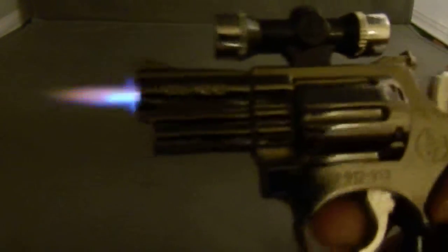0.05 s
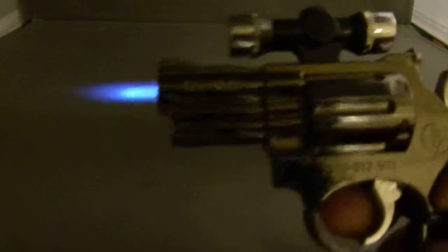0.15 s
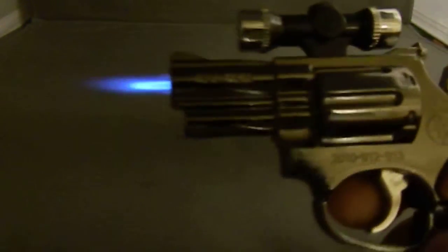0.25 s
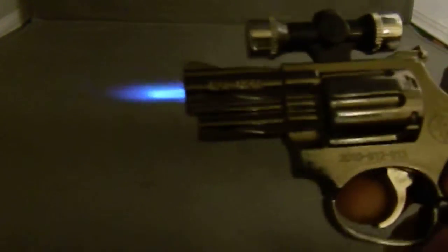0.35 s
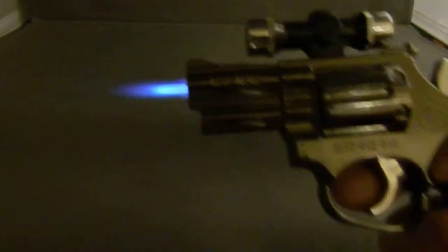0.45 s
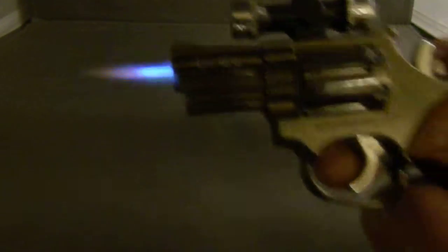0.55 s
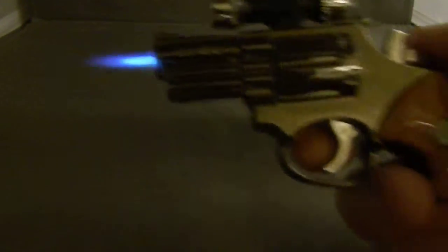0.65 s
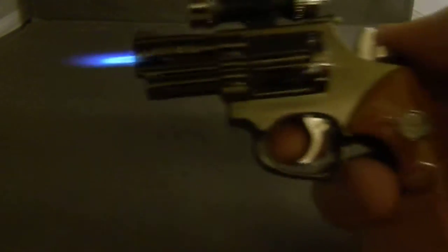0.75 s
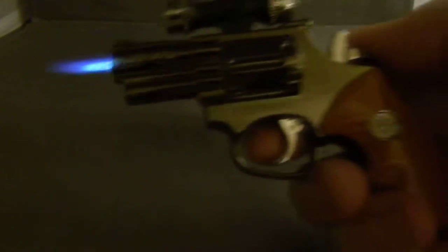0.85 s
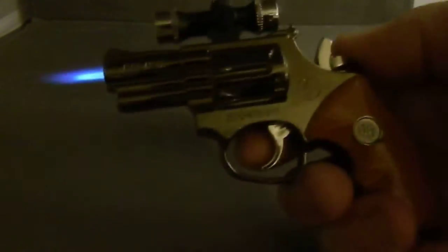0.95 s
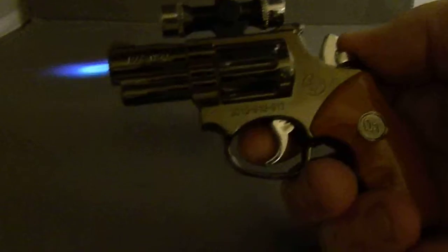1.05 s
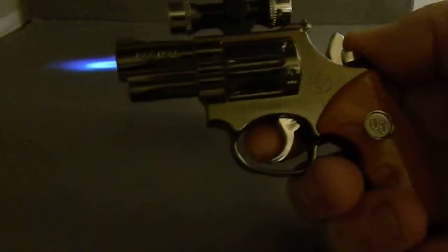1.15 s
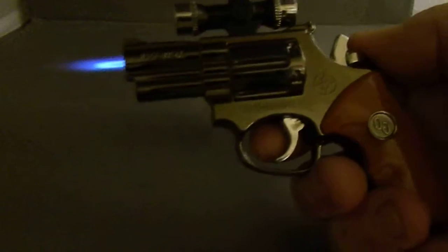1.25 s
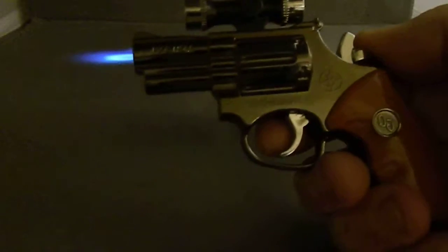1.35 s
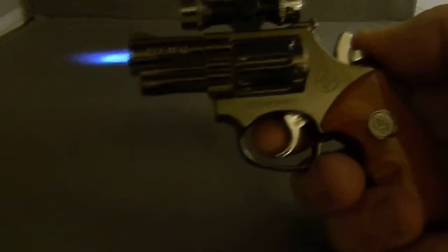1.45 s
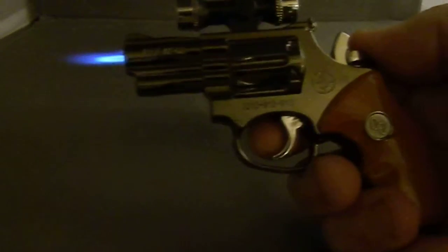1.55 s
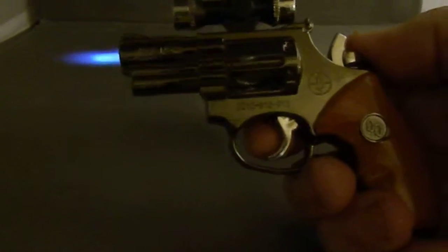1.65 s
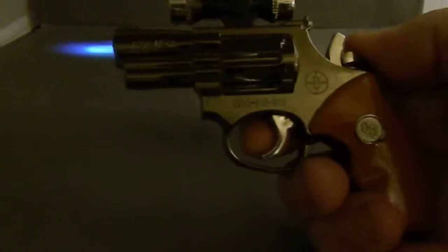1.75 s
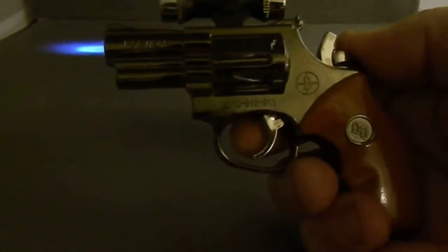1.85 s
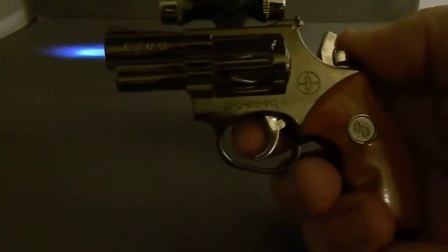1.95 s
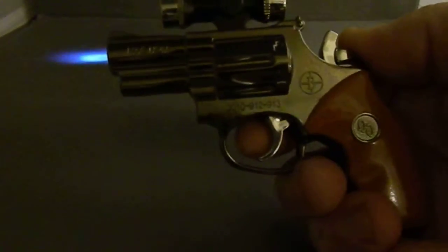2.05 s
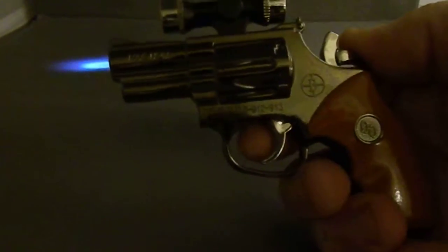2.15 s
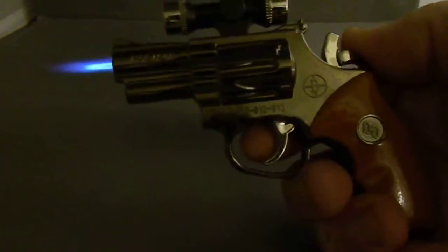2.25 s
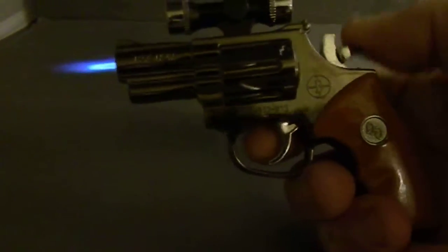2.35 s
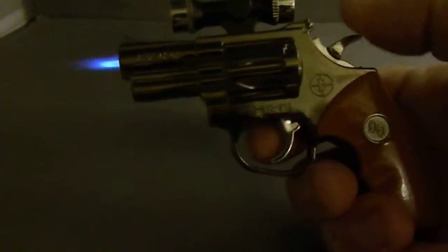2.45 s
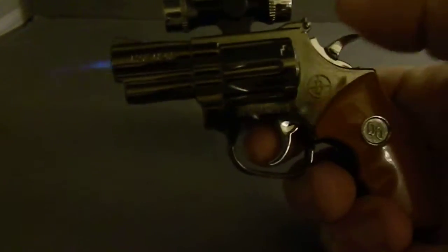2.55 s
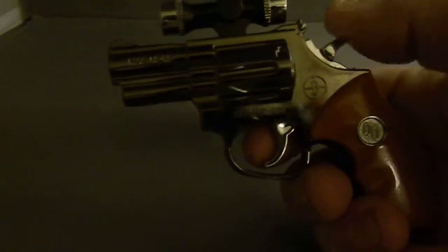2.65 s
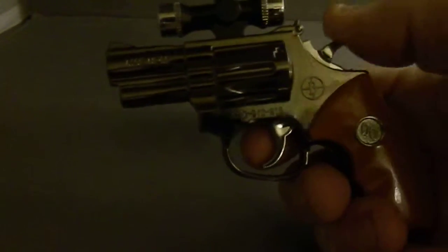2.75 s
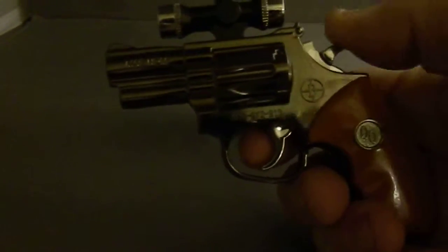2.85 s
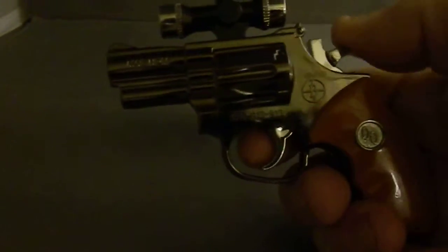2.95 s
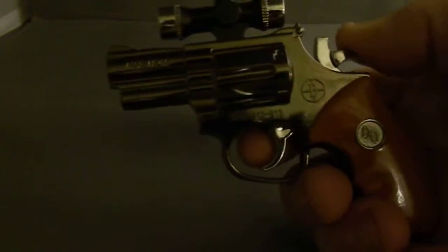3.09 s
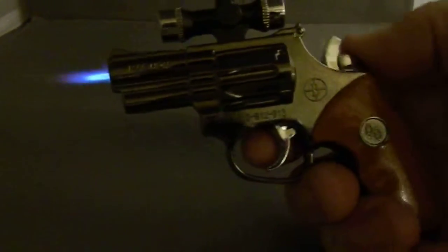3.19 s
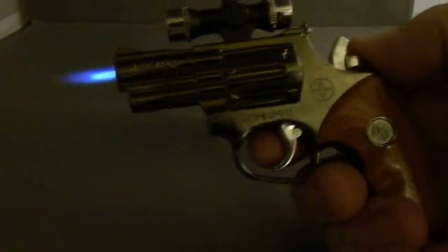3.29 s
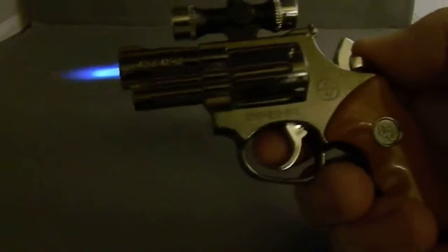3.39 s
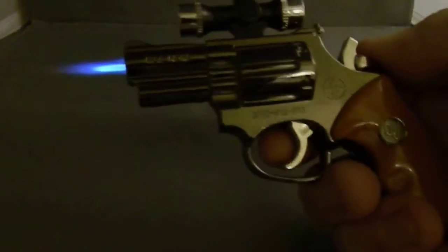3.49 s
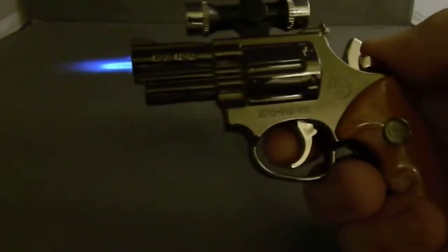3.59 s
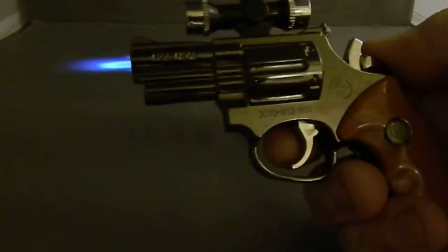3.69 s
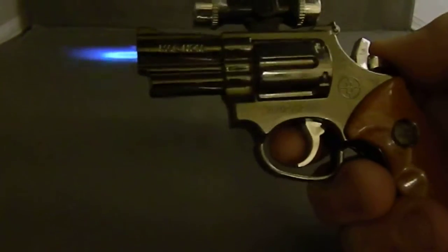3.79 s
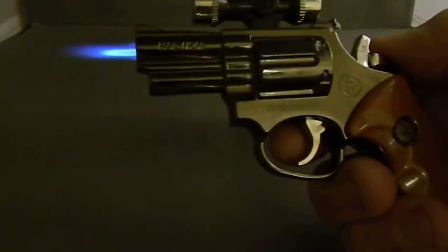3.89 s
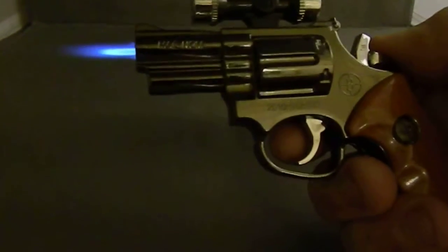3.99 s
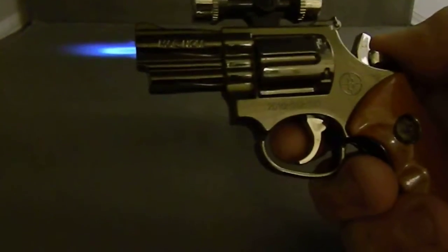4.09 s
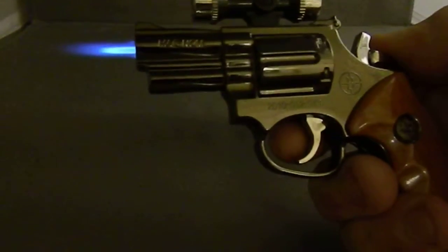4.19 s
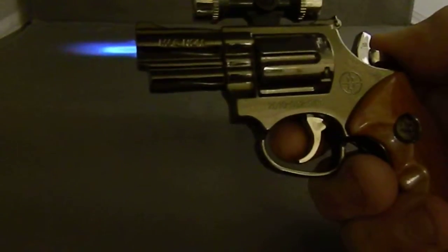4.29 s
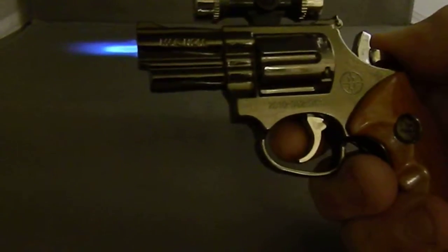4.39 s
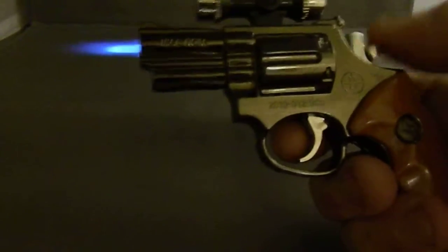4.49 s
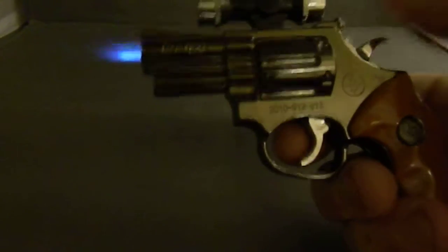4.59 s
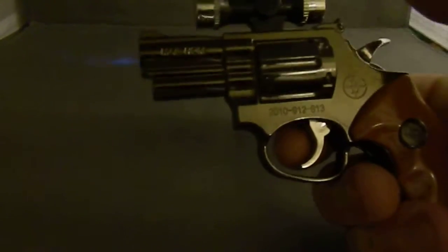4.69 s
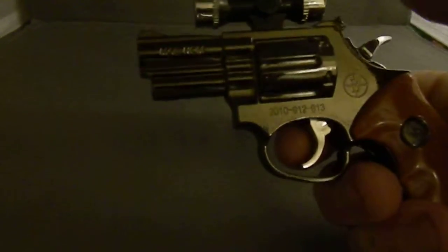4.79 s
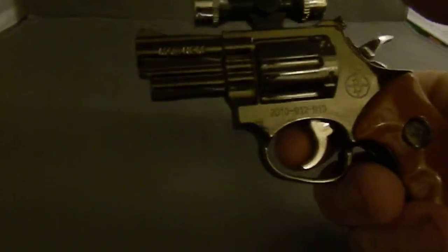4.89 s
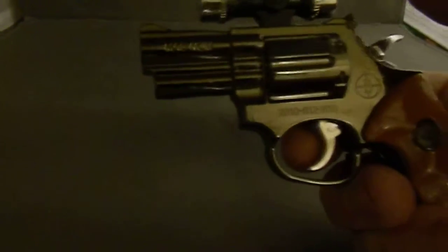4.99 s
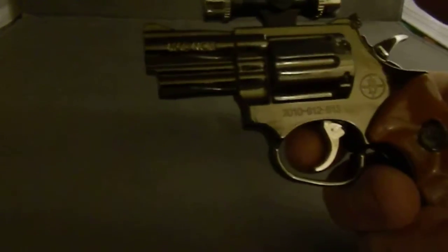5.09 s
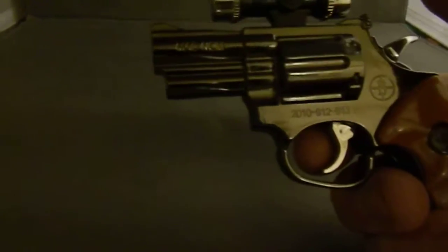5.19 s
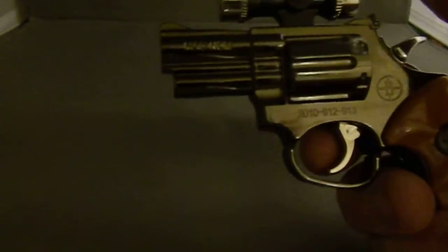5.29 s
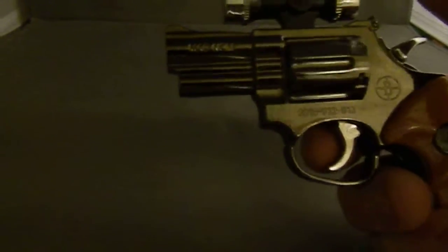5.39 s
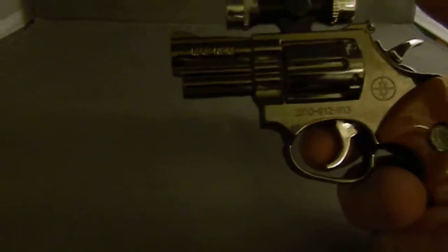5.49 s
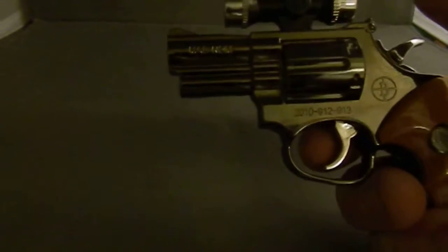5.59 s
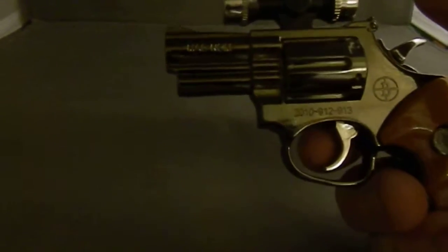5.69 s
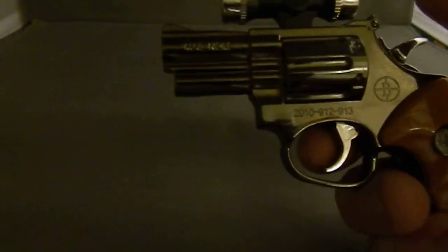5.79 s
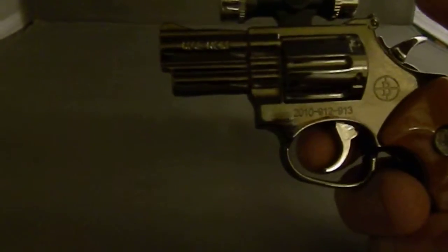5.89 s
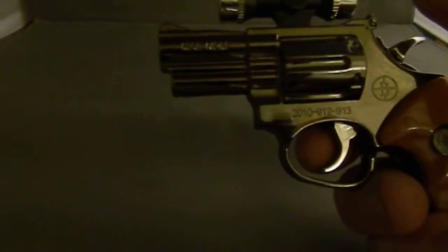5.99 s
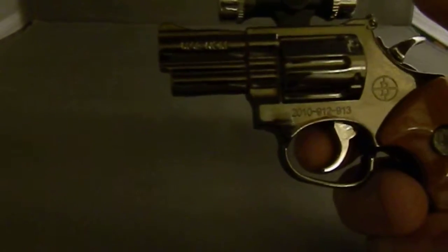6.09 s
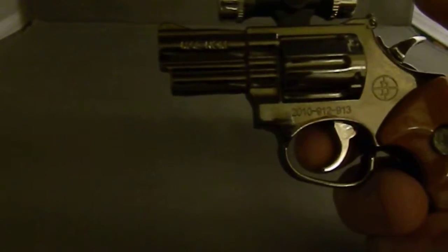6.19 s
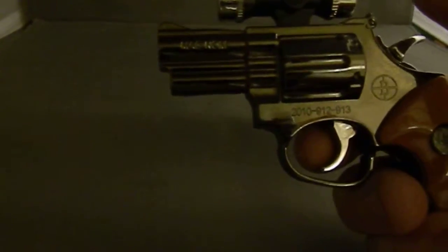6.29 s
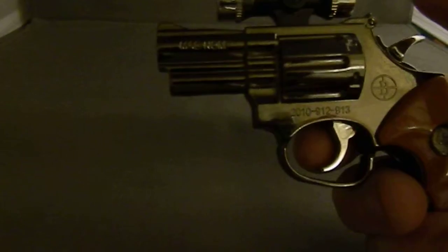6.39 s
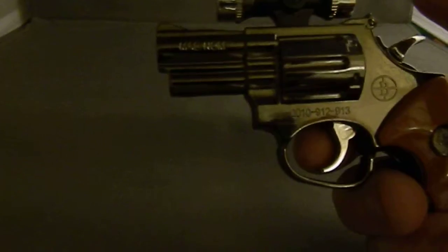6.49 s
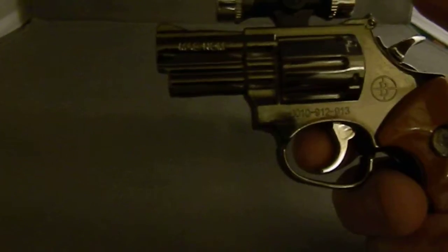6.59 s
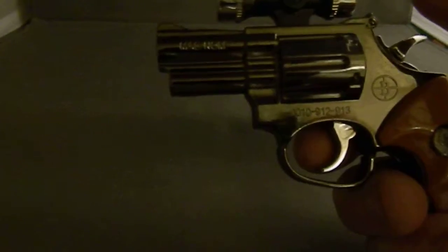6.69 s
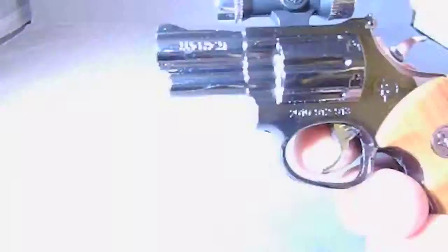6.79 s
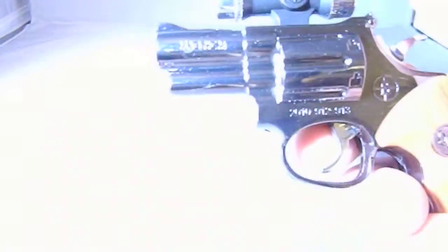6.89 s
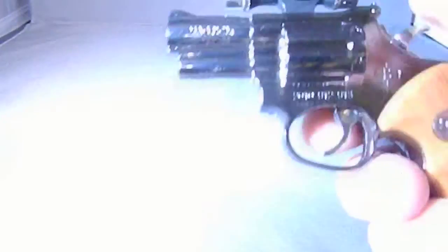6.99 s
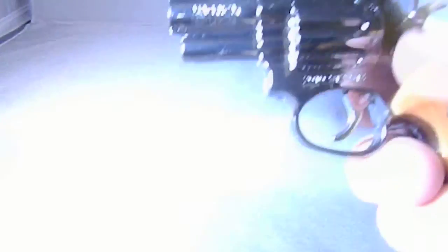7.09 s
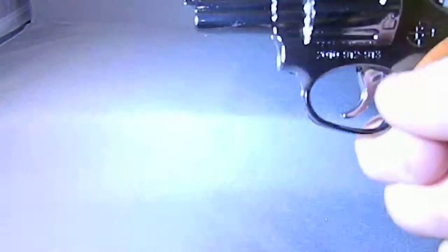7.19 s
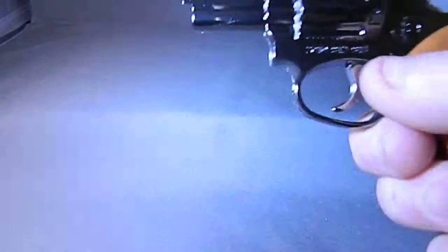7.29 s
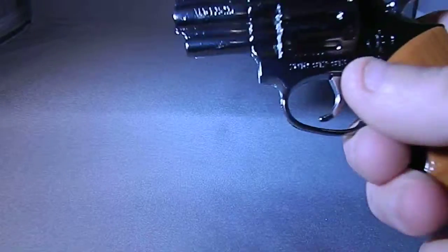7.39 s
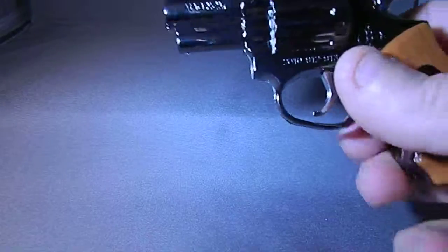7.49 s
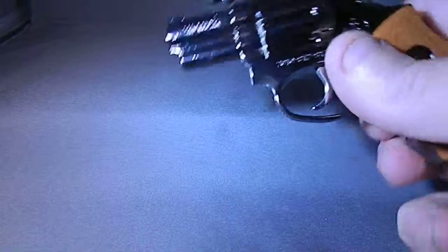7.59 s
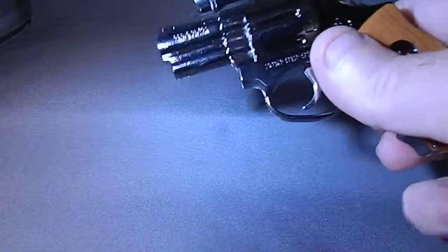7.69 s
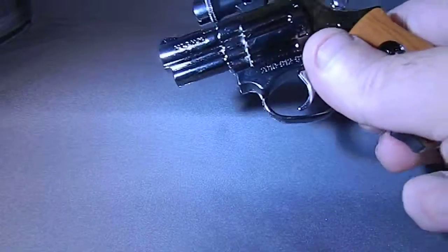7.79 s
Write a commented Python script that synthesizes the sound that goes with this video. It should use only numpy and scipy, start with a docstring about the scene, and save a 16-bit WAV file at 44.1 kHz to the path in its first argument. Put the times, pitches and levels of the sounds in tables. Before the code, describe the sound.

A quiet small room with low rumble and faint mains hum, heard very close over a desk. At about 0.05 s a jet lighter's trigger mechanism snaps, a very loud, bright metallic crack with a tight rebound and short room reflection. A steady gas jet roars and hisses at once, ducked by the snap and seeming to swell back. From 1 s a faint low wavering note sings inside it, fading. At 2.4 s a softer springy click shuts the valve and the hiss dies rapidly, flame just after. Around 3.0 s thin unlit gas hisses, then at 3.16 s a second, even harder snap starts another jet, until a duller click near 4.53 s. Then near silence: small finger rubs from 4.9 to 5.5 s, a faint clink at 5.18 s, a crisp lamp-switch click at 6.77 s, soft handling and a hollow little knock at 7.4 s, with final rubs around 7.5 s.

```python
"""A jet torch lighter is fired twice close to the microphone, over a desk in a small quiet room.
Each piezo snap is a shaped noise burst ringing the metal body; it ducks the recorder's gain, so the
steady jet of coloured noise seems to swell until a softer click shuts the valve and the flame dies.
Low in the first burn the flame sings; a thin hiss of unlit gas leads into the second.
Later a lamp is switched on and the lighter is handled, over room noise and a low hum."""
import sys
import numpy as np
from scipy import signal
from scipy.fft import rfft, irfft, next_fast_len
from scipy.io import wavfile
from scipy.ndimage import uniform_filter1d, minimum_filter1d

SR = 44100
rng = np.random.default_rng(int(sys.argv[2]) if len(sys.argv) > 2 else 0)


def waveform_to_disk(signal):
    """Save audio, clipped to [-1, 1], as 16-bit WAV at the path in sys.argv[1]."""
    frames = np.transpose(np.atleast_2d(signal))
    scaled = np.clip(frames, -1, 1) * 32767
    samples = np.round(scaled).astype(np.int16)
    wavfile.write(sys.argv[1], SR, samples)


N = 346185
TIME = np.arange(N) / SR   # s
NOISE_SIZE = 2 * next_fast_len(N // 2 + 1, real=True)
FREQS = np.maximum(np.fft.rfftfreq(NOISE_SIZE, 1 / SR), 1)   # Hz
HIT_SIZE = 16384   # samples in every hit and in the room response
HIT_TIME = TIME[:HIT_SIZE]   # s

# In all tables a positive left_right_db means the left channel is louder.


def from_db(db):
    """Decibels to gain."""
    return 10 ** (np.asarray(db) / 20)


def rms_one(x):
    """Scale to an rms of one."""
    return x / np.sqrt(np.mean(x ** 2) + 1e-20)


def at_hz(points):
    """Join the points of a spectrum table on a log-frequency axis."""
    hz, value = np.transpose(points)
    return np.interp(np.log(FREQS), np.log(hz), value)


def panned(left_right_db):
    """Gains of the two channels, half the difference to each."""
    return from_db(np.array([[.5], [-.5]]) * left_right_db)


def add(out, start_s, sound):
    """Mix a stereo sound in at a time."""
    start = max(round(start_s * SR), 0)
    out[:, start:start + sound.shape[1]] += sound[:, :N - start]


def smooth_low(x, order, cutoff_hz):
    """Low-pass a sound with a gentle Butterworth slope."""
    return signal.sosfilt(signal.butter(order, cutoff_hz, fs=SR, output="sos"), x)


def resonate(x, hz, width_hz):
    """A two-pole resonance with gain one at its top."""
    radius = np.exp(-np.pi * width_hz / SR)
    zeros = np.array([1, 0, -1]) * (1 - radius * radius) / 2
    poles = [1, -2 * radius * np.cos(2 * np.pi * hz / SR), radius * radius]
    return signal.lfilter(zeros, poles, x + 1e-18)


def stereo_noise(shape_db, likeness, balance):
    """Steady coloured noise of rms one, partly shared by the two channels."""
    mid, side = rfft(rng.standard_normal((2, NOISE_SIZE)))
    alike = np.clip(at_hz(likeness), 0, .99)
    pair = np.sqrt(1 + alike) * mid + np.sqrt(1 - alike) * side * [[1], [-1]]
    coloured = pair * from_db(shape_db) * panned(at_hz(balance))
    return rms_one(irfft(coloured))[:, :N]


def chatter(t60_s, apart_hz=6000):
    """Parts rattle as they meet: a dying burst, evened in spectrum, whose treble differs left to right."""
    fade = from_db(-60 * HIT_TIME / max(t60_s, .002))
    burst = rng.standard_normal((2, HIT_SIZE)) * fade
    for _ in range(3):
        spectrum = rfft(burst)
        flat = irfft(spectrum / (np.abs(spectrum) + 1e-12))
        burst = flat * fade ** (1 / 4)
    treble = signal.butter(1, min(apart_hz, SR / 3), "high", fs=SR, output="sos")
    side = signal.sosfilt(treble, burst[1])
    return burst[0] + .75 * side * [[1], [-1]]


def struck(burst, modes):
    """A burst rings a set of modes, added with alternating sign."""
    ringing = 0
    for k, (hz, width_hz, level_db) in enumerate(modes):
        ringing = ringing + (-1) ** k * from_db(level_db) * resonate(burst, hz, width_hz)
    return ringing


def at_level(hit, level_db):
    """Give a hit the energy of three milliseconds at this level."""
    return from_db(level_db) * rms_one(hit) * np.sqrt(.003 * SR / HIT_SIZE)


def single_blow(event, modes, t60_s):
    """One blow rattles an object and rings its own modes."""
    out = np.zeros((2, N))
    start_s, level_db, left_right_db = event
    hit = at_level(struck(chatter(t60_s), modes), level_db)
    add(out, start_s, hit * panned(left_right_db))
    return out


ROOM_T60_S, TREBLE_T60_S = 0.29, 0.26


def in_room(x, wet_db, gap_s=0.012, early_db=7, early_t60_s=0.19):
    """Direct sound, dense early echoes from desk and walls, and a tail whose treble dies first."""
    white = rng.standard_normal((2, HIT_SIZE))
    low = smooth_low(white, 1, 3000)
    low_tail = low * from_db(-60 * HIT_TIME / ROOM_T60_S)
    treble_tail = (white - low) * from_db(-60 * HIT_TIME / TREBLE_T60_S)
    early = white * from_db(early_db - 60 * HIT_TIME / early_t60_s)
    swell = np.minimum(HIT_TIME / gap_s, 1) ** 2   # the echoes gather over the gap
    response = rms_one((low_tail + treble_tail + early) * swell) / np.sqrt(HIT_SIZE)
    return x + from_db(wet_db) * signal.oaconvolve(x, response, axes=1)[:, :N]


# near reflections from desk and hand, most cancelling a narrow band of lever and jet:
# pitch_hz [Hz], width_hz [Hz], gain_db [dB]
REFLECTION_BANDS = [(780, 107, -40), (1190, 350, -12), (1560, 490, -18.5), (2550, 204, -9),
                    (3190, 124, -14), (3660, 82, -21), (5480, 270, -10.5), (6120, 220, -12.5),
                    (6620, 140, -12), (7380, 180, -8.5), (8500, 77, -9), (9600, 72, 3), (10020, 330, -15),
                    (11160, 330, -17), (13500, 180, -4)]


def reflected(x):
    """Reflections from the desk and the hand reshape narrow bands, mostly by cancelling them."""
    for hz, width_hz, gain_db in REFLECTION_BANDS:
        x = x - (1 - from_db(gain_db)) * resonate(x, hz, width_hz)
    return x


# colour of the room's air noise: pitch_hz [Hz], density_db [relative dB per Hz]
AIR_COLOUR = [(15, -31), (25, -34), (48, -7.5), (123, -3.5), (157, -9.5), (291, -5), (461, -15.5),
              (513, -9.5), (557, -16.5), (604, -13.5), (791, -18.5), (1510, -16.5), (1870, -22),
              (2150, -23), (15800, -37.5)]
# how alike left and right are: pitch_hz [Hz], likeness [0 to 1, lower counts as 0]
ROOM_LIKENESS = [(60, 0.25), (150, 0.72), (380, 0.59), (950, 0.42), (2380, -0.25), (5980, -0.26),
                 (15000, -0.18)]
# stereo balance of the room: pitch_hz [Hz], left_right_db [dB]
ROOM_BALANCE = [(60, -2.5), (180, -3), (550, -2), (1650, -0.5), (4970, 0.0), (15000, 1)]
# low resonances of the room, stirred by its air: pitch_hz [Hz], width_hz [Hz], level_db [dB]
ROOM_RESONANCES = [(56.6, 4.2, -65), (125.6, 11, -62), (190.8, 14, -62.5), (223, 14, -64), (289, 7.9, -62),
                   (533, 4.9, -69), (973, 99, -62.5)]
# steady mains hum: pitch_hz [Hz], level_db [dB rms]
MAINS = [(59.5, -66), (120, -64.5)]


def room_tone(air_db=-49):
    """Low rumble and faint hiss, wavering room resonances and a steady mains hum."""
    air = from_db(air_db) * stereo_noise(at_hz(AIR_COLOUR), ROOM_LIKENESS, ROOM_BALANCE)

    density, hum_power = 0, 0
    for hz, width_hz, level_db in ROOM_RESONANCES:
        power = from_db(level_db) ** 2
        density = density + power / width_hz * np.exp(-2 * ((FREQS - hz) / width_hz) ** 2)
        hum_power += power
    wavering = stereo_noise(10 * np.log10(density + 1e-20), ROOM_LIKENESS, ROOM_BALANCE)

    mains = 0
    for hz, level_db in MAINS:
        wave = np.sin(2 * np.pi * (hz * TIME + rng.random()))
        mains = mains + np.sqrt(2) * from_db(level_db) * wave
    return air + mains * panned(-2.5) + np.sqrt(hum_power) * wavering


# the lamp switch is thrown once: start_s [s], level_db [dB], left_right_db [dB]
SWITCH = (6.7693, -19, 4.5)
# modes of the switch: pitch_hz [Hz], width_hz [Hz], level_db [dB]
SWITCH_MODES = [(1060, 470, -12), (2950, 420, -10), (4270, 250, -2.5), (5330, 250, 6), (5830, 88, -14),
                (7400, 110, -10), (9170, 480, -4), (9980, 160, -4), (10400, 420, -1), (11500, 240, -4),
                (12600, 1600, -9), (15100, 1000, -11)]


def lamp_switch():
    """A lamp switch snaps over: one short rattle rings its modes."""
    blow = single_blow(SWITCH, SWITCH_MODES, t60_s=.02)
    return in_room(blow, wet_db=-5, gap_s=.005, early_db=6, early_t60_s=0.097)


# small ticks and rubs of the fingers: start_s [s], level_db [dB], pitch_hz [Hz],
# width_hz [Hz, a second filter is twice as wide], t60_s [s]
TICKS = [(4.4661, -36, 2860, 700, .025), (4.8797, -46, 1200, 1000, .03), (5.096, -44.5, 1100, 1800, 0.27),
         (5.318, -42, 786, 1070, 0.073), (5.5137, -49, 4970, 3500, .031), (6.927, -53, 6000, 7000, 0.014),
         (7.193, -45, 500, 1300, 0.082), (7.463, -42, 1790, 400, 0.055), (7.464, -51, 4700, 1200, .06),
         (7.543, -41.5, 650, 300, .25), (7.545, -52, 3520, 900, .22)]


def fingers():
    """Each shift of the grip is a short, grainy rub in one broad resonance; soft skin blunts its start."""
    out = np.zeros((2, N))
    for start_s, level_db, hz, width_hz, t60_s in TICKS:
        wander = uniform_filter1d(rng.standard_normal(HIT_SIZE), size=150)
        grain = from_db(3 * rms_one(wander))   # level wanders by 3 dB rms
        soft_start = np.minimum(HIT_TIME / (t60_s / 10), 1)
        rub = chatter(t60_s) * grain * soft_start
        rub = resonate(resonate(rub, hz, width_hz), hz, 2 * width_hz)
        add(out, start_s, at_level(rub, level_db))
    return in_room(out * panned(-1.5), wet_db=-6)


# the lighter is bumped once: start_s [s], level_db [dB], left_right_db [dB]
KNOCK = (7.3914, -23, -1.2)
# modes of the knock: pitch_hz [Hz], width_hz [Hz], level_db [dB]
KNOCK_MODES = [(200, 180, -14.5), (710, 124, -2), (914, 57, 2.5), (1330, 126, 2), (1820, 230, -6),
               (2200, 300, -6.5), (3480, 590, -13.5), (5150, 490, -24), (10600, 5400, -34)]


def knock():
    """The lighter is bumped: one short rattle rings mostly low modes."""
    blow = single_blow(KNOCK, KNOCK_MODES, t60_s=.018)
    return in_room(blow, wet_db=-4.5, gap_s=.008, early_db=10, early_t60_s=.08)


# a loose part clinks once: start_s [s], level_db [dB], left_right_db [dB]
CLINK = (5.1765, -38.5, -1.5)
# modes of the loose part: pitch_hz [Hz], width_hz [Hz], level_db [dB]
CLINK_MODES = [(2880, 90, -3), (3400, 60, 2), (3880, 55, 0), (4600, 250, -15), (5250, 180, -14),
               (6266, 90, -11)]


def clink():
    """A loose part of the lighter clinks: one short rattle rings its bright modes."""
    return in_room(single_blow(CLINK, CLINK_MODES, t60_s=.02), wet_db=-7.0)


# hiss of the unlit gas: pitch_hz [Hz], density_db [relative dB per Hz]
LEAK_COLOUR = [(500, -30), (2500, 7), (3800, -9), (5100, -1), (6500, 1), (11500, 0.5), (15500, -15.5)]
# the second, slow press opens the valve this long ahead of the spark
LEAK_LEAD_S, LEAK_DB, LEAK_GROWTH_DB_PER_S = 0.16, -46.5, 150   # LEAK_DB is reached at the spark


def unlit_gas():
    """A thin hiss grows as the valve opens, until the spark lights it."""
    to_spark = BURNS[1][0] - TIME
    escaping = (to_spark > 0) & (to_spark < LEAK_LEAD_S)
    flow = from_db(LEAK_DB - LEAK_GROWTH_DB_PER_S * np.abs(to_spark)) * escaping
    return flow * stereo_noise(at_hz(LEAK_COLOUR), JET_LIKENESS, JET_BALANCE)


# the flame starts to sing low in the nozzle during the first burn
NOTE_HZ, NOTE_WIDTH_HZ = 239.5, 7   # a second filter is twice as wide
NOTE_START_S, NOTE_ATTACK_S, NOTE_DB, NOTE_FADE_DB_PER_S = 1.02, 0.15, -48.5, 10.5


def flame_note():
    """Noise in a narrow resonance: a low wavering note sets in, fades and stops when the valve shuts."""
    ringing = resonate(rng.standard_normal(N), NOTE_HZ, NOTE_WIDTH_HZ)
    note = rms_one(resonate(ringing, NOTE_HZ, 2 * NOTE_WIDTH_HZ))
    age = np.maximum(TIME - NOTE_START_S, 0)
    fade = from_db(NOTE_DB - NOTE_FADE_DB_PER_S * age)
    valve_open = TIME < BURNS[0][1]
    return fade * np.minimum(age / NOTE_ATTACK_S, 1) * valve_open * note


# burns of the jet: open_s [s], shut_s [s], level_db [dB], tilt_db [dB per octave about 1 kHz]
BURNS = [(.056, 2.445, -41, 0.5), (3.162, 4.569, -40, 0)]
# roar and hiss of the jet: pitch_hz [Hz], density_db [relative dB per Hz]
JET_COLOUR = [(45, -41), (80, -18), (170, -5.5), (245, -3.5), (350, -9), (480, 3), (700, 0.5), (1000, 3.5),
              (2000, 0), (2950, -6.5), (3400, -10.5), (3750, -21.5), (5000, -16), (10000, -25),
              (15500, -26)]
# how alike left and right are: pitch_hz [Hz], likeness [0 to 1]
JET_LIKENESS = [(60, 0.44), (150, 0.99), (380, 0.94), (950, 0.94), (2380, 0.9), (5980, 0.42), (15000, 0.15)]
# stereo balance of the jet: pitch_hz [Hz], left_right_db [dB]
JET_BALANCE = [(60, -29), (130, -3.5), (290, -1.5), (640, -2.0), (1410, -1.0), (3100, -1), (6820, 1.0),
               (15000, 2.5)]


def jet(hiss_fade_s=0.039, roar_fade_s=0.18, out_after_s=0.09, split_hz=1100):
    """Turbulent gas burns steadily; the valve shuts, pressure sinks, hiss goes first, then the flame."""
    out = 0
    for open_s, shut_s, level_db, tilt_db in BURNS:
        colour_db = at_hz(JET_COLOUR) + tilt_db * np.log2(FREQS / 1000)
        gas = rms_one(reflected(stereo_noise(colour_db, JET_LIKENESS, JET_BALANCE)))
        roar = smooth_low(gas, 1, split_hz)
        hiss = gas - roar
        draining = np.maximum(TIME - shut_s, 0)   # seconds since the valve shut
        lighting = np.clip((TIME - open_s) / 0.0078, 0, 1)
        going_out = np.clip((out_after_s - draining) / 0.017 + 1, 0, 1)
        sinking = roar * np.exp(-draining / roar_fade_s) + hiss * np.exp(-draining / hiss_fade_s)
        out = out + from_db(level_db) * lighting * going_out * sinking
    return out


# strokes of the thumb lever, pressed and released twice: start_s [s], level_db [dB],
# hardness_hz [Hz, contact low-pass], body_hz [Hz, favoured pitch], favour_db [dB, its added share],
# rattle_t60_s [s], thump_db [dB], spring_db [dB relative to the stroke], left_right_db [dB]
LEVER = [(0.0525, 3.5, 13900, 1800, -0.5, .023, -12.5, -52, -1.5),
         (2.3990, -16.5, 10800, 1740, 2.5, .018, -12, -20, -4),
         (3.157, 7, 12000, 2100, -1, 0.023, -11.5, -43, -1.5),
         (4.5340, -12, 4180, 2880, 2.5, 0.012, -26, -38, -4)]
# metal body of the lighter: pitch_hz [Hz], width_hz [Hz], level_db [dB]
BODY = [(1190, 170, -6), (1840, 330, 0.5), (2360, 300, -1), (2770, 280, 0), (3233, 220, 0), (4350, 480, -5),
        (4966, 180, 0.5), (5480, 350, -2.5), (6340, 270, -1.5), (7100, 270, -4), (8080, 400, -4.5),
        (9780, 660, -4), (11570, 1100, -6), (14000, 1900, -12)]
# return spring of the lever: pitch_hz [Hz], level_db [dB], t60_s [s]
SPRING = [(5865, 0, .19), (5910, -8, .15), (4300, -13, .14)]
# after each stroke the lever rebounds, weaker every time
REBOUND_S, REBOUND_DB, REBOUND_LOSS_DB = .0092, -22, 0.5


def spring_ring():
    """The return spring rings as a few dying sines."""
    ring = 0
    for hz, level_db, t60_s in SPRING:
        ring = ring + np.sin(2 * np.pi * hz * HIT_TIME) * from_db(level_db - 60 * HIT_TIME / t60_s)
    return ring


def lever(favour_width_hz=450, edge_db=-13, count=3):
    """The piezo hammer snaps on pressing, the lever lands softer on release; strokes rebound, spring rings."""
    out = np.zeros((2, N))
    spring = spring_ring()
    for (start_s, level_db, hardness_hz, body_hz, favour_db,
         rattle_t60_s, thump_db, spring_db, left_right_db) in LEVER:
        add(out, start_s, from_db(level_db + spring_db) * spring * panned(left_right_db))
        for k in range(count):   # the stroke itself, then its rebounds
            burst = chatter(rattle_t60_s, apart_hz=7000)
            contact = smooth_low(burst, 2, min(hardness_hz, SR / 3))
            # even a soft landing keeps a sharp metal edge
            contact = contact + from_db(edge_db) * (burst - contact)
            body = struck(contact, BODY)
            # the point of contact favours one mode
            body = body + from_db(favour_db) * resonate(body, body_hz, favour_width_hz)
            thump = resonate(burst, 260, 1050) + from_db(6.0) * resonate(burst, 116, 25)
            weaker_db = REBOUND_DB - REBOUND_LOSS_DB * (k - 1) if k else 0
            hit = reflected(body + from_db(thump_db) * thump)
            hit = at_level(hit, level_db + weaker_db)
            add(out, start_s + k * REBOUND_S, hit * panned(left_right_db))
    return in_room(out, wet_db=-11, gap_s=0.0062, early_db=17, early_t60_s=0.094)


def scene():
    """Lighter, lamp switch and handling over the room tone."""
    handling = fingers() + knock() + clink()
    lighter = unlit_gas() + flame_note() + jet() + lever()
    return room_tone() + lamp_switch() + handling + lighter


def hush(x, split_hz=3500, below_db=-64, slope=1.6):
    """Noise reduction: treble under a threshold is turned down by slope dB for each dB it lacks."""
    low = signal.sosfiltfilt(signal.butter(2, split_hz, fs=SR, output="sos"), x)
    treble = x - low
    power = uniform_filter1d(np.mean(treble ** 2, axis=0), size=1500)
    treble_db = 10 * np.log10(np.maximum(power, 1e-12))
    return low + treble * from_db(slope * np.minimum(treble_db - below_db, 0))


def record(dry, limit_db=-12.5, recover_db_per_s=18, top=0.39, cutoff_hz=15900):
    """A limiter ducks at once and recovers slowly; peaks are rounded, faint hiss hushed, the top cut."""
    power = uniform_filter1d(np.mean(dry ** 2, axis=0), size=132)
    over_db = np.maximum(10 * np.log10(np.maximum(power, 1e-12)) - limit_db, 0)
    # hold the largest overshoot while it recovers at a steady rate
    recovery_db = recover_db_per_s * TIME
    duck_db = np.maximum.accumulate(over_db + recovery_db) - recovery_db
    gain_db = uniform_filter1d(minimum_filter1d(-duck_db, size=60), size=20)
    limited = top * np.tanh(dry * from_db(gain_db) / top)
    top_cut = signal.ellip(10, .2, 80, cutoff_hz, fs=SR, output="sos")
    return signal.sosfilt(top_cut, hush(limited))


dry = scene()
out = record(dry)
waveform_to_disk(out)
```